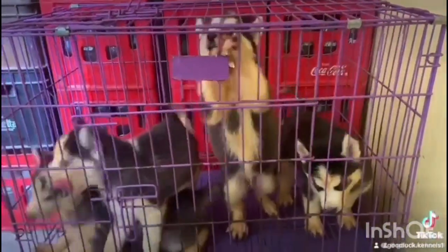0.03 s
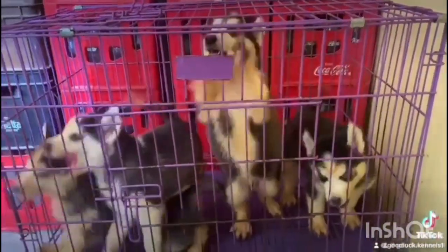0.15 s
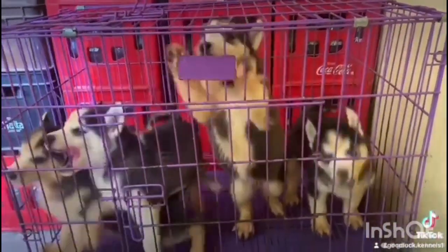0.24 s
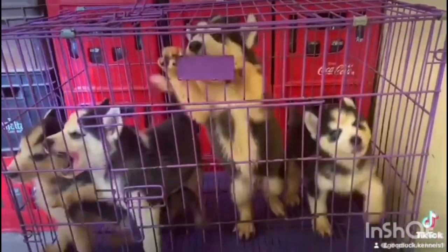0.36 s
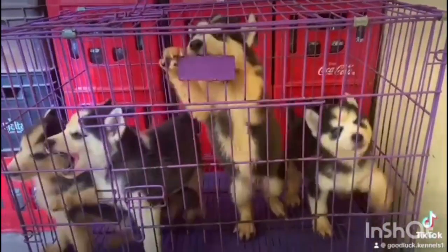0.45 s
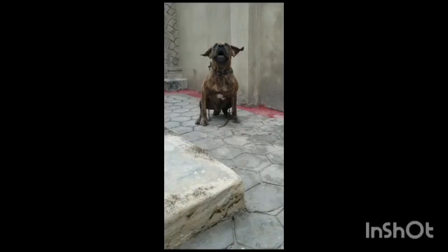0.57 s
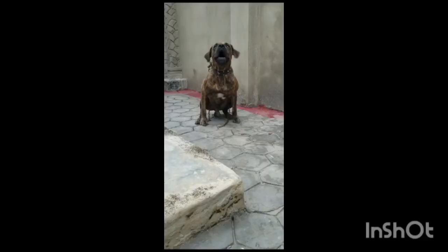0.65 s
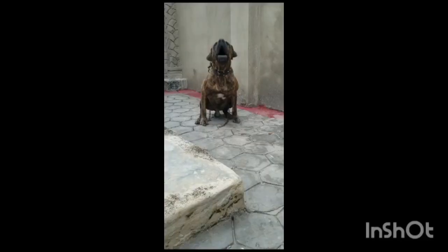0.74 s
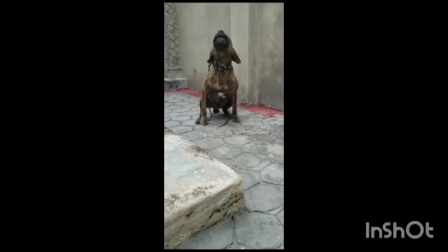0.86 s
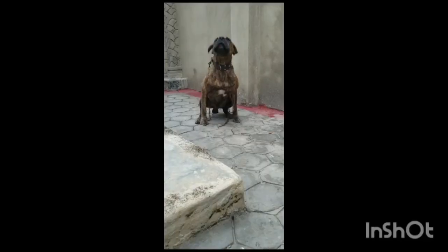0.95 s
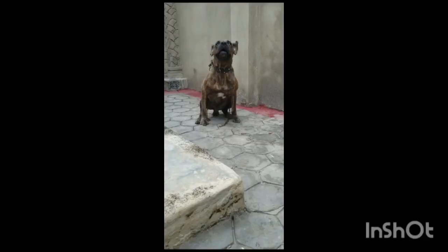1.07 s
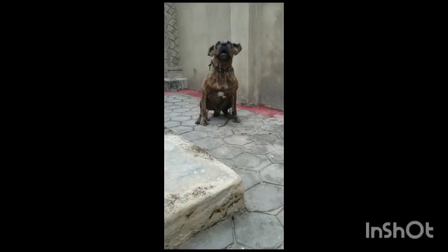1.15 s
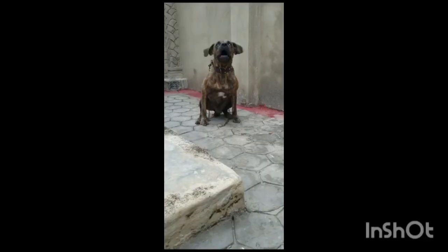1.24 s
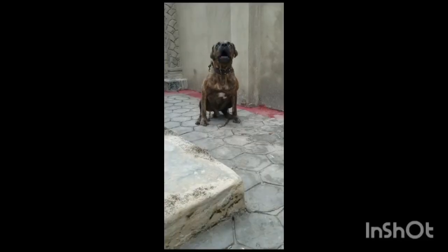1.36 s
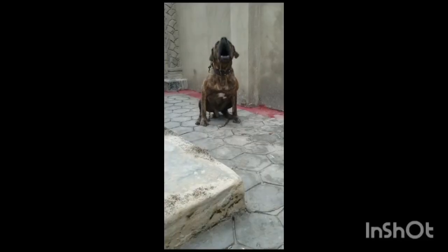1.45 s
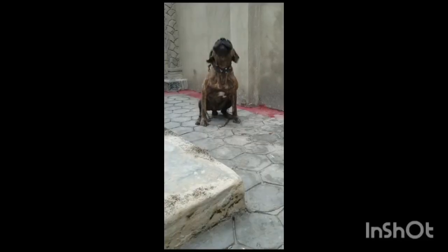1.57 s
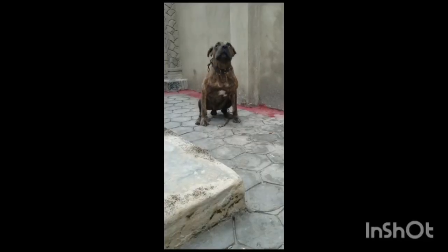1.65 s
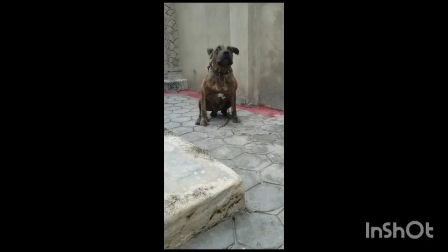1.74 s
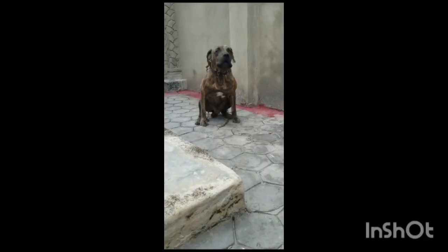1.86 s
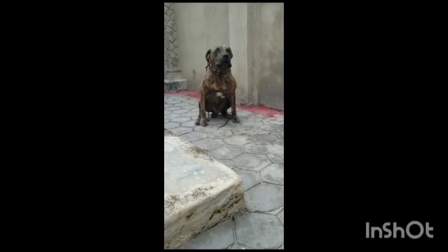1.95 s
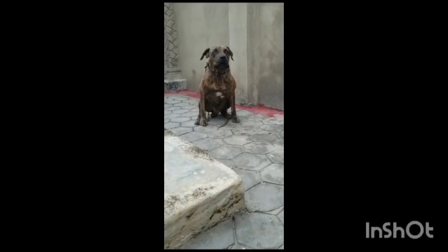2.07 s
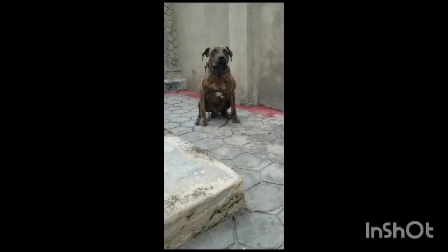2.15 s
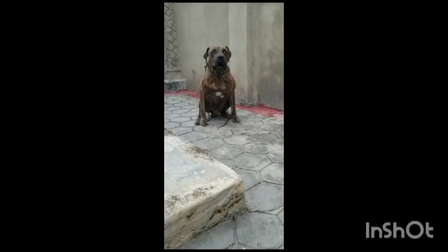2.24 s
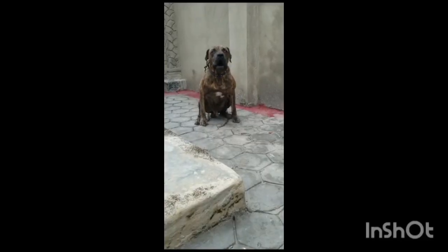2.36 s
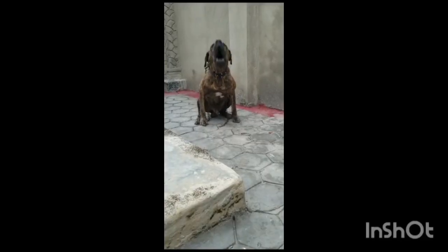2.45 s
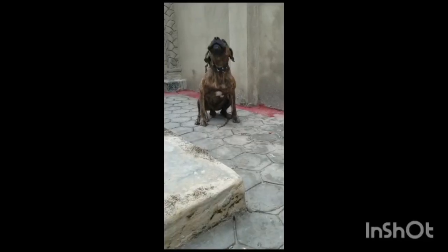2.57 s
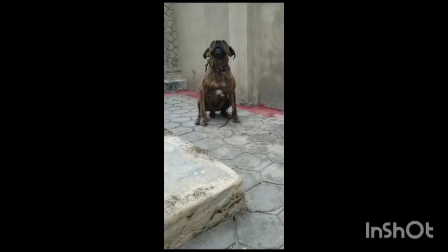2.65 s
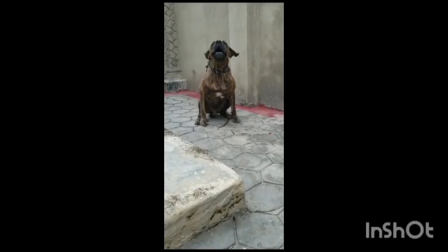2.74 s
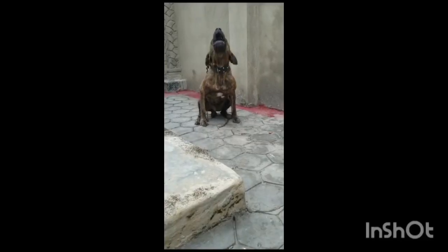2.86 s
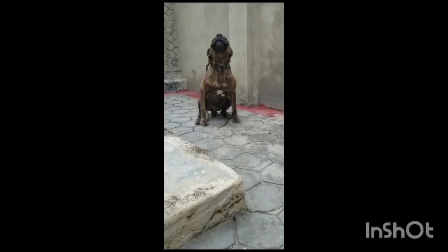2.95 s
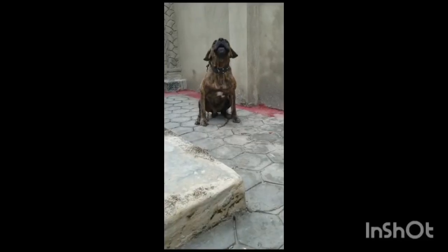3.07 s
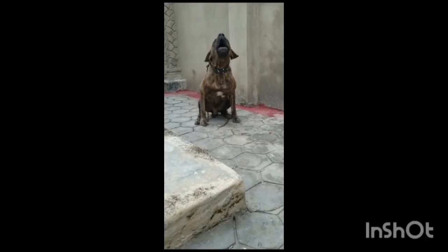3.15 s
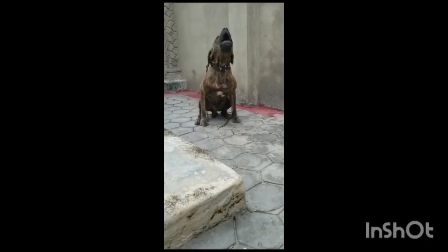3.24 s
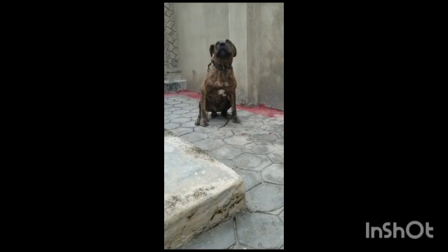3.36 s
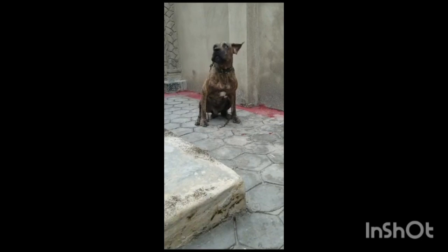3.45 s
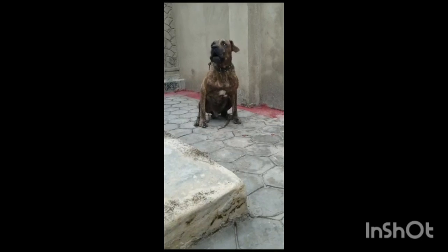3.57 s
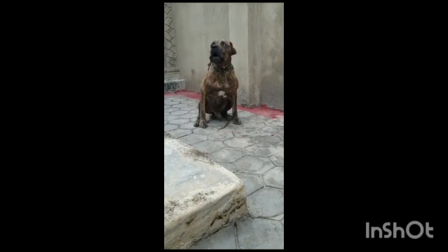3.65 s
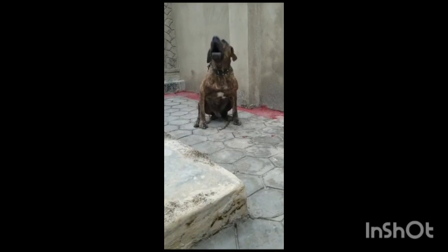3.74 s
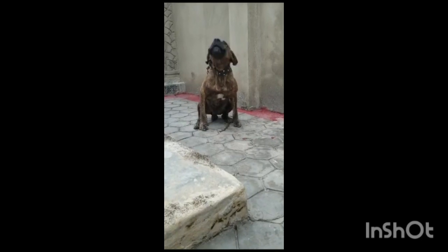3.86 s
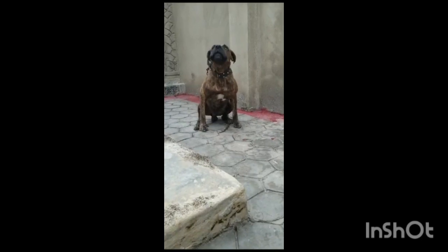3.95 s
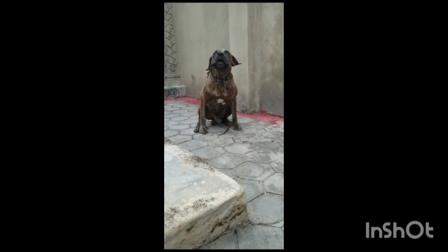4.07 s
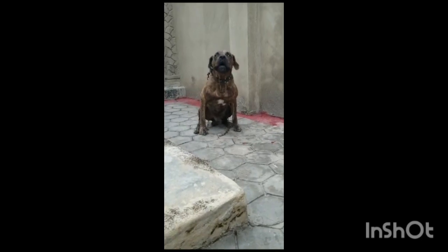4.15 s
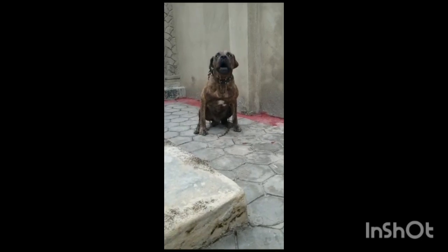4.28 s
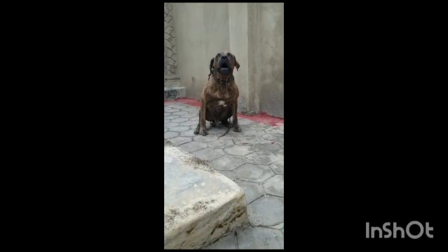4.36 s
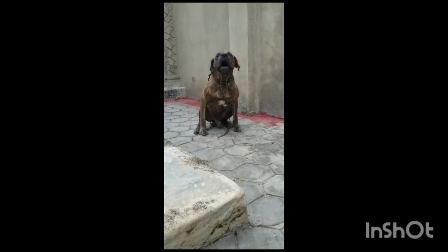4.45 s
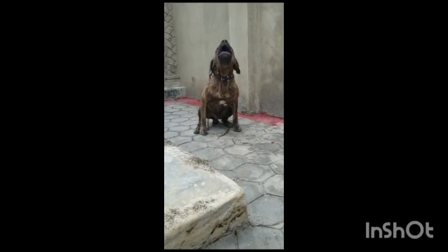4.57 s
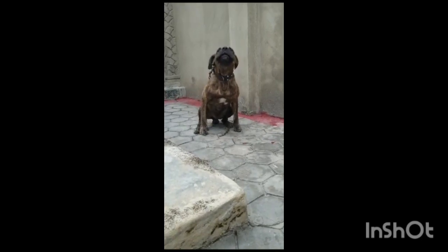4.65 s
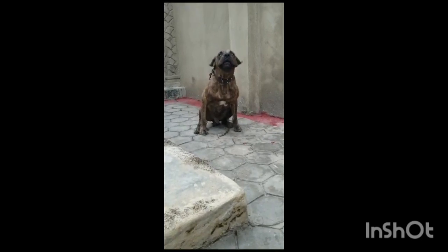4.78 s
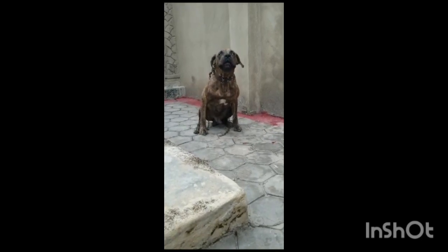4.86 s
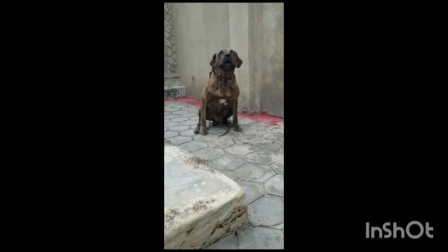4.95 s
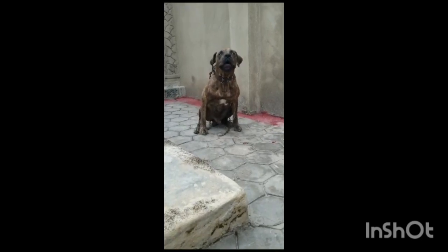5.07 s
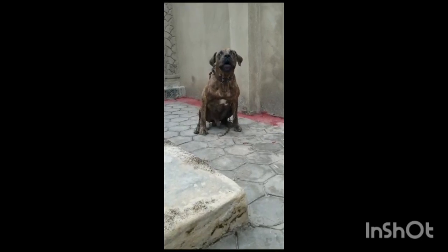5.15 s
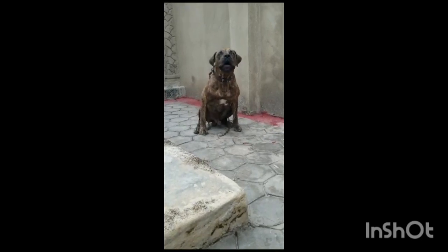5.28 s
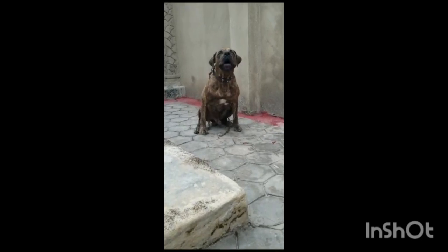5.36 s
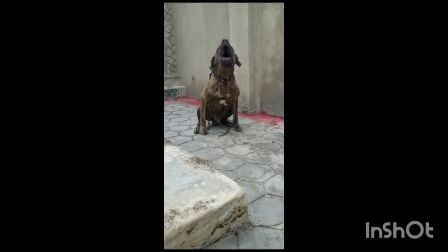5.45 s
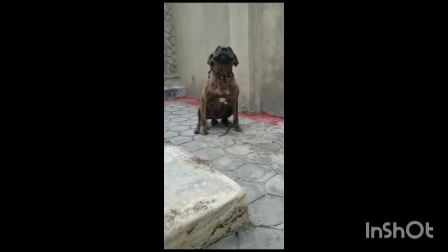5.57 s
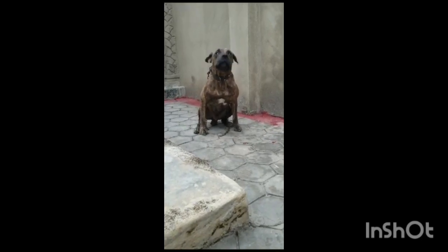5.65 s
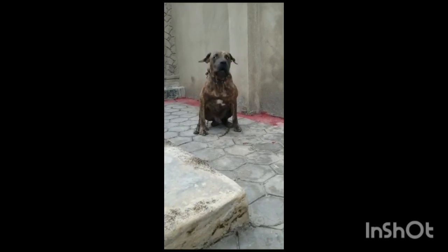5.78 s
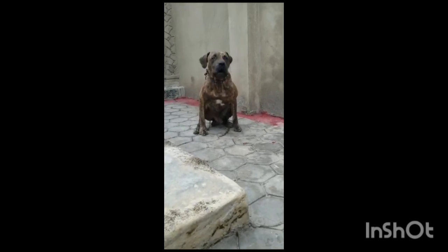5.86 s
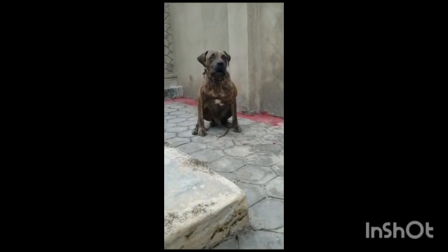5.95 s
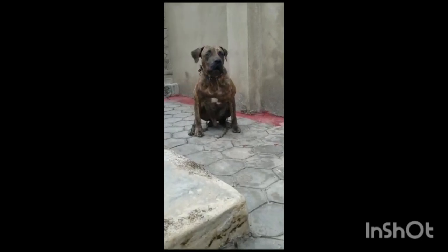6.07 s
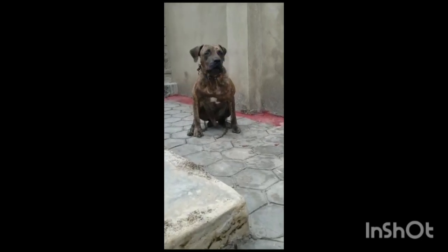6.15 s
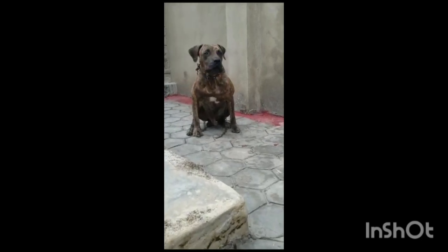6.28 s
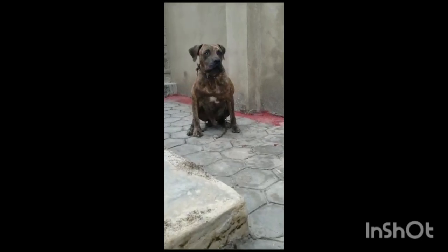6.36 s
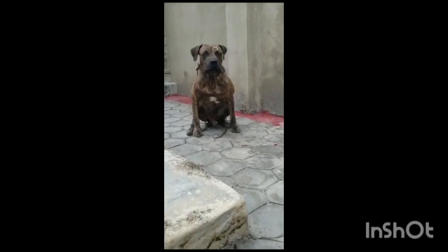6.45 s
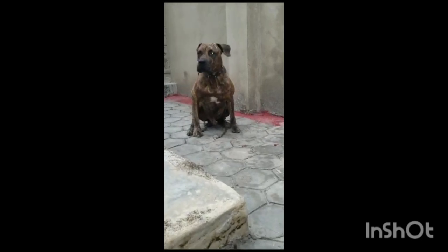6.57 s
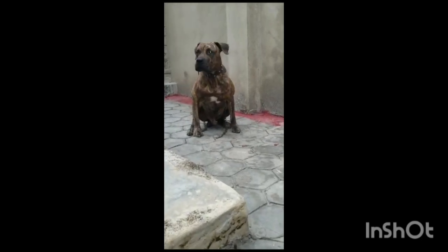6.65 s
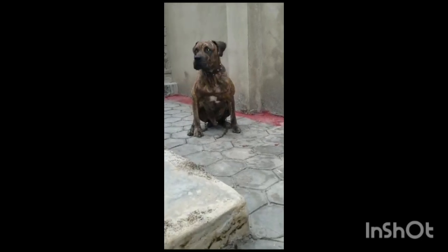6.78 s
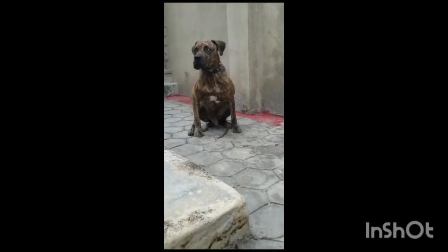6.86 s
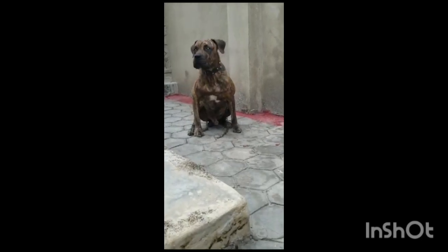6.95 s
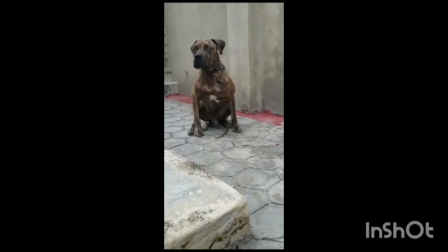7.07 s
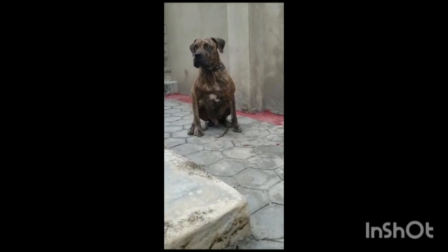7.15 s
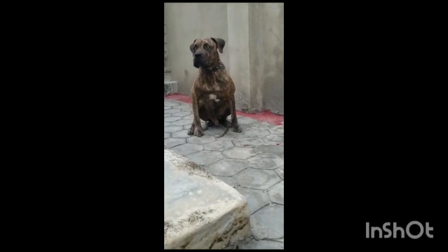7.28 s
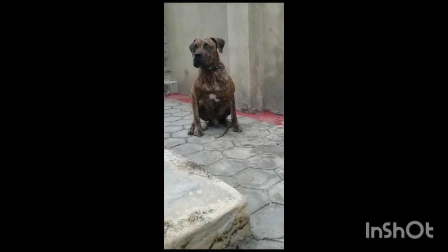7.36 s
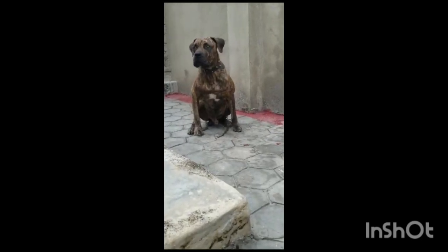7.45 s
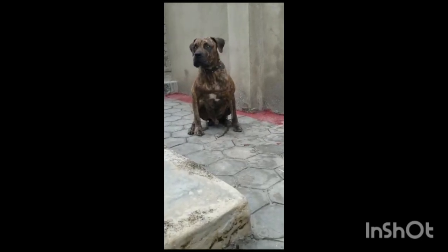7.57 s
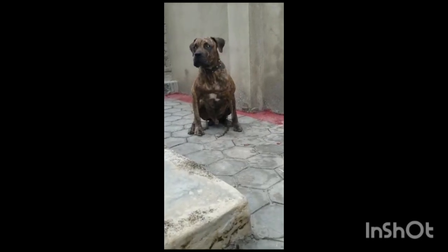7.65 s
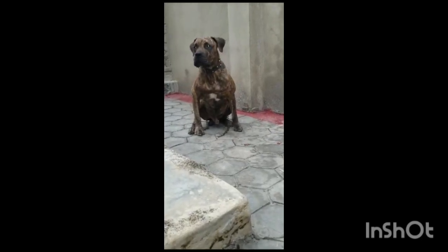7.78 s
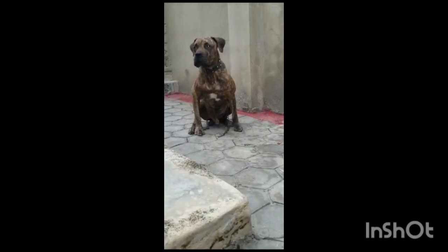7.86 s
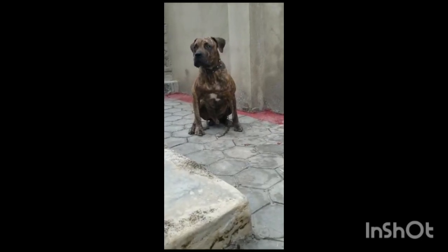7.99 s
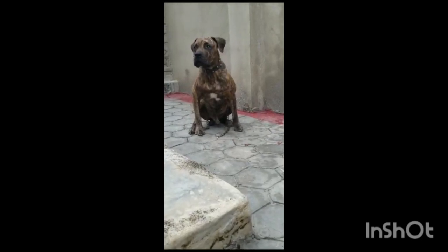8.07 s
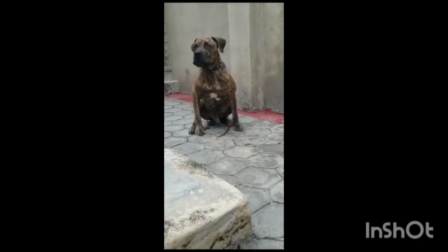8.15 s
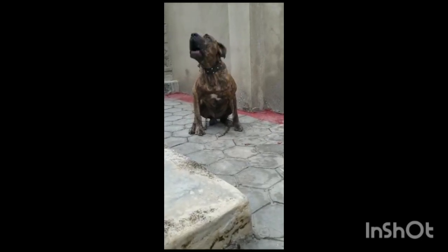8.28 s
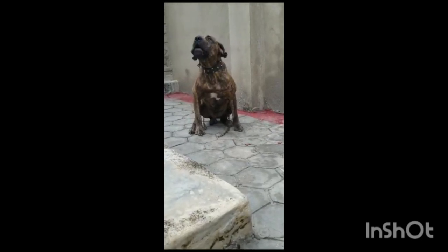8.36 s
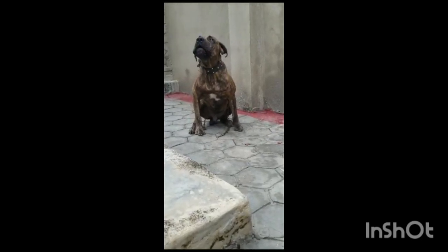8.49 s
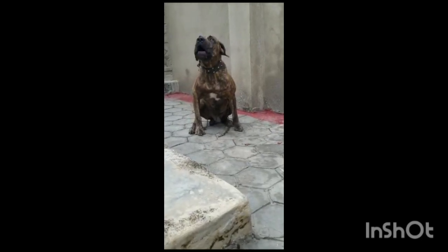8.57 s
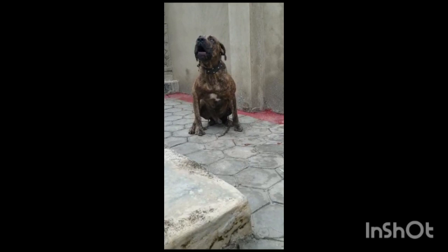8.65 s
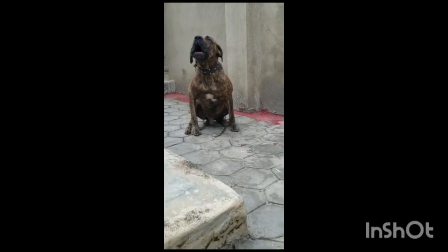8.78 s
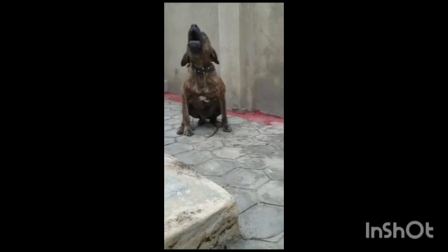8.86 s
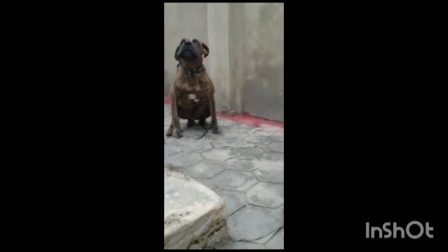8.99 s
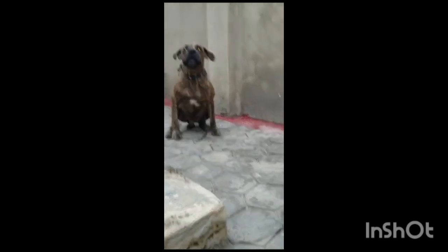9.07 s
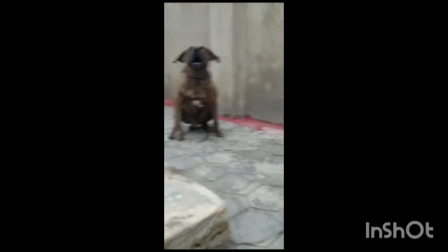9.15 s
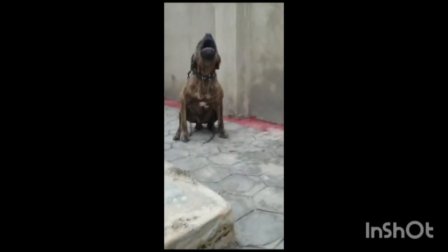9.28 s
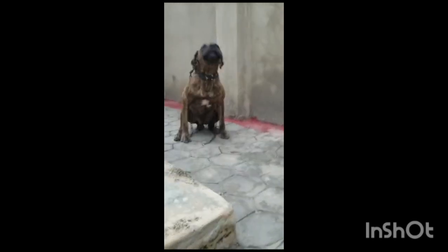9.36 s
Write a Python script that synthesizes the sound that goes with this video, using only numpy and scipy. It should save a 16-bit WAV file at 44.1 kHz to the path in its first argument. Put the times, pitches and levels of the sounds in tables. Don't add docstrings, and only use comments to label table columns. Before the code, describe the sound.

Silence until about 0.55 s, then a hard cut with tiny ticks into the echo of an earlier bark. A large dog a few metres from the phone barks at 0.75 and 1.4 s: short, deep-chested, rough and throaty, loud enough to clip, with wall slaps and a tail of most of a second. Distant yelps come near 1.15 s. Near barks follow at 2.4, 2.75, 3.15, 3.7, 4.45 and 5.4 s, the one at 3.15 slightly clearer. A higher young dog barks farther away at 5.25 s, then a run of five hoarse distant barks from 5.8 to 6.95 s. Faint whines around 7.5-8 s and a dull finger tap at 7.95 precede near barks at 8.15, 8.8 and 9.15 s, with faint metallic collar ticks. Sparse bird chirps, insect hiss and low town rumble continue underneath, swelling late.

```python
import sys
import numpy as np
from scipy import signal
from scipy.fft import rfft, irfft, next_fast_len
from scipy.io import wavfile
from scipy.ndimage import uniform_filter1d, map_coordinates

SR = 44100
rng = np.random.default_rng(int(sys.argv[2]) if len(sys.argv) > 2 else 0)


def to_wav(sig):
    pcm = np.clip(np.atleast_2d(sig), -1, 1) * 32767
    pcm = np.round(pcm).astype(np.int16)
    wavfile.write(sys.argv[1], SR, pcm.T)


def field_ratio(decibels):
    return 10 ** (np.asarray(decibels, dtype=float) / 20)


N = 415422


def unit(x):
    return x / np.sqrt(np.mean(x ** 2) + 1e-20)


def along(points, hz):
    f, v = np.transpose(points)
    return np.interp(np.log(hz + 1), np.log(f + 1), v)


def wobble(n, rate):
    knots = rng.standard_normal(int(SR / 2 * rate / SR + n * rate / SR) + 4)
    return map_coordinates(knots, [np.arange(n) * rate / SR])


def filtered(x, response):
    n = x.shape[-1]
    m = next_fast_len(n + 8192)
    return irfft(rfft(x, m) * response(np.fft.rfftfreq(m, 1 / SR)), m)[..., :n]


def modes(rows):
    def response(f):
        total = 0
        for k, (centre_hz, width_hz, db) in enumerate(rows):
            damping = 1j * f * width_hz
            total = total + (-1) ** k * field_ratio(db) * damping / (centre_hz ** 2 - f * f + damping)
        return total
    return response


def ring(x, hz, width_hz):
    turn = np.exp(2j * np.pi * np.cumsum(hz) / SR)
    return np.real(turn * signal.lfilter([1], [1, -np.exp(-np.pi * width_hz / SR)], x / turn))


def patchy(x, depth_db):
    z = signal.stft(x, nperseg=256)[2]
    field = uniform_filter1d(rng.standard_normal(z.shape), size=4, axis=0)
    field = uniform_filter1d(field, size=10, axis=1)
    return signal.istft(z * field_ratio(depth_db * unit(field)), nperseg=256)[1][:len(x)]


def fades(n, rise_s, fall_s):
    t = np.arange(n) / SR
    return np.clip(t / rise_s, 0, 1) * np.clip((t[-1] - t) / fall_s, 0, 1)


def shares(length_s):
    return np.arange(0, length_s, 1 / SR) / length_s


def hump(u, peak, before, after):
    peak = np.clip(peak, .05, .95)
    return -np.where(u < peak, before * (1 - u / peak) ** 2, after * ((u - peak) / (1 - peak)) ** 2)


def add(total, start, x):
    total[:, start:start + x.shape[1]] += x[:, :N - start]


def yard(x, direct_db, wet_db):
    # (frequency [Hz], t60 [s])
    t60_rows = [(150, 1), (400, 0.56), (1000, 0.58), (2000, 0.69), (3000, 0.67), (5600, 0.65), (7200, 0.33),
                (15000, 0.58)]
    hz = np.fft.rfftfreq(256, 1 / SR)[:, None]
    t = np.arange(240) * 128 / SR
    real, imag, lumps = rng.standard_normal((3, 3, len(hz), len(t)))
    lumps = uniform_filter1d(lumps[0], size=3, axis=0)
    lumps = unit(uniform_filter1d(lumps, size=8, axis=1))
    decay_db = 4.64 * lumps - 60 * t / along(t60_rows, hz)
    z = (real + 1j * imag) * field_ratio(decay_db) * np.clip(t / 0.0088, 0, 1)
    shared = z[0] / (1 + (hz / 1300) ** 2)
    tail = signal.istft(shared + 0.46 * z[1:], SR, nperseg=256)[1]
    tail = field_ratio(wet_db) * tail / np.linalg.norm(tail[0])
    tail[:, 0] = field_ratio(direct_db)
    for port, walls in zip(tail, rng.integers(60, 900, (2, 6))):
        port[walls] += field_ratio(direct_db - 8.0) * rng.choice([-1, 1], size=6)
    return signal.fftconvolve(x[None], tail, axes=1)


def ports(x, lag):
    # (frequency [Hz], left minus right [dB])
    colour_rows = [(50, -7.5), (250, -4.5), (1000, -2.5), (3000, -5.5), (5000, -9), (9000, 0),
                   (14000, -0.5)]
    side = np.array([[.5], [-.5]])
    return filtered(x, lambda f: field_ratio(side * along(colour_rows, f)) * np.exp(-2j * np.pi * f * side * lag / SR))


def air():
    # (time [s], rumble level [dB], insect level [dB])
    level_rows = [
        (0, -70.5, -86.5),
        (6.599, -73.5, -90),
        (6.9, -62.5, -70.5),
        (7.501, -68, -81.5),
        (7.8, -61, -76.5),
        (8.4, -55, -74.5),
        (9.42, -65, -83.5),
    ]
    # (frequency [Hz], density [dB per Hz])
    insect_rows = [(4800, -28), (5400, -1.5), (5750, -11), (6100, -5.5), (6500, -34)]
    # (frequency [Hz], density [dB per Hz])
    rumble_rows = [(20, -11), (60, -3.5), (120, -2.5), (180, -12), (260, -10), (400, -8), (800, -18.5),
                   (1200, -52.5)]
    # (frequency [Hz], density [dB per Hz])
    hiss_rows = [(410, -53.5), (700, -24.5), (1320, -16), (2590, -17), (3180, -12), (4400, -14.5),
                 (5850, -5.5), (6660, -21.5), (15400, -19)]

    def noise(shape):
        return unit(filtered(rng.standard_normal((2, N)), lambda f: field_ratio(along(shape, f))))

    time_s, *levels = np.transpose(level_rows)
    rumble_db, insect_db = (np.interp(np.arange(N) / SR, time_s, level) for level in levels)
    rumble = field_ratio(rumble_db + 2.5 * wobble(N, 5)) * noise(rumble_rows)
    insect = field_ratio(insect_db) * noise([(4000, -85), *insect_rows, (7500, -79.0)])
    hiss = field_ratio(-70.0 + 0.41 * (insect_db + 87.5)) * noise([(200, -79.5), *hiss_rows])
    return rumble + insect + hiss


def small_sounds():
    # (time [s], length [s], from [Hz], to [Hz], level [dB])
    chirp_rows = [
        (1.212, .06, 3320, 3400, -69),
        (1.878, 0.2, 3400, 3340, -77.5),
        (2.34, 0.11, 3510, 3180, -69),
        (3.593, .15, 3800, 2880, -65),
        (7.005, .25, 3380, 3280, -83),
        (7.051, .15, 3020, 2830, -79),
        (7.281, .22, 3110, 3100, -79),
    ]
    # (time [s], level [dB])
    tap_rows = [
        (7.9362, -37),
    ]
    # (time [s], level [dB])
    cut_rows = [
        (.5540, -27),
        (.5757, -29),
    ]
    # (time [s], frequency [Hz], level [dB])
    collar_rows = [
        (8.494, 5900, -49),
        (8.76, 3600, -57),
        (8.773, 5500, -70),
        (9.112, 6300, -57),
    ]
    settle_s = .018
    out = np.zeros((2, N))
    both = np.ones((2, 1))
    for s, length_s, from_hz, to_hz, db in chirp_rows:
        hz = to_hz + (from_hz - to_hz) * np.exp(-shares(length_s) * length_s / settle_s)
        n = len(hz)
        phase = 2 * np.pi * np.cumsum(hz * (1 + 0.0089 * wobble(n, 84.0))) / SR
        note = np.sin(phase) + .12 * np.sin(2 * phase)
        add(out, round(s * SR), field_ratio(db + 6 * wobble(n, 40)) * fades(n, .02, .02) * note * both)
    t = np.arange(600) / SR
    for s, db in tap_rows:
        thud = -np.cos(2 * np.pi * 130 * t + .6) * field_ratio(-60 * t / .03)
        click = 2.2 * field_ratio(-60 * t / .002) * (1 - .6 * np.cos(2 * np.pi * 5200 * t))
        add(out, round(s * SR), field_ratio(db + np.array([[-4], [1]])) * (thud - click))
    for s, db in cut_rows:
        add(out, round(s * SR), field_ratio(db - 60 * t / .0006) * both)
    for s, hz, db in collar_rows:
        add(out, round(s * SR), field_ratio(db - 60 * t / 0.025) * np.sin(2 * np.pi * hz * t) * both)
    return out


def arch(length_s, top_hz, low_db, high_db):
    u = shares(length_s)
    pitch_hz = top_hz * (1 + hump(u, peak=.45, before=.24, after=.24))
    return pitch_hz, low_db + hump(u, 0.32, 8.5, 14), high_db + hump(u, 0.38, 17, 17)


def glide(length_s, from_hz, to_hz, db, even_hz, bright_db_per_hz):
    u = shares(length_s)
    peak = np.clip(.5 + 3.5 * (to_hz / from_hz - 1), .1, .85)
    hz = from_hz + (to_hz - from_hz) * u ** (1.5 * peak)
    low_db = db + hump(u, peak, 10, 14.5)
    return hz, low_db, low_db + bright_db_per_hz * (hz - even_hz)


def call(pitch_hz, low_db, high_db, rough, tracts):
    n = len(pitch_hz)
    k = np.arange(1, 10)[:, None]
    phase = 2 * np.pi * np.cumsum(pitch_hz * (1 + .05 * rough * wobble(n, 120))) / SR
    partials = np.sin(k * phase) * field_ratio(7 * rough * wobble(n, 90))
    voice = 0
    for tract, db in zip(tracts, (low_db, high_db)):
        tone = unit(np.sum(field_ratio(along(tract, k * pitch_hz)) * partials, axis=0))
        hoarse = filtered(rng.standard_normal(n), lambda f: field_ratio(along([(100, -64.0), *tract], f)))
        voice = voice + field_ratio(db) * (tone + rough ** 2 * unit(hoarse))
    return fades(n, .03, .03) * voice


def far_dogs():
    # (time [s], length [s], top pitch [Hz], low partials [dB], high partials [dB])
    arch_rows = [
        (5.235, 0.11, 516.4, -30.5, -34),
        (5.817, .13, 525, -40, -52.5),
        (6.005, .2, 494.4, -38, -48.5),
        (6.236, .22, 492.3, -38.5, -46),
        (6.483, .23, 490, -37.5, -43.5),
        (6.73, .23, 470, -33, -41.5),
    ]
    # (time [s], length [s], from [Hz], to [Hz], level [dB])
    yelp_rows = [
        (1.14, 0.072, 451, 549, -30),
        (1.195, 0.09, 705, 656, -44.5),
        (4.84, 0.05, 703, 752, -48.5),
        (6.96, 0.184, 402.5, 337.4, -54),
    ]
    # (time [s], length [s], from [Hz], to [Hz], level [dB])
    whine_rows = [
        (2.27, 0.18, 294.6, 312, -65),
        (7.46, 0.17, 306, 258.3, -57),
        (7.77, 0.179, 276.3, 338, -53.5),
        (7.95, 0.11, 350.2, 359.5, -42),
    ]
    # (time [s], length [s], from [Hz], to [Hz], level [dB])
    thin_rows = [
        (.66, 0.057, 560, 570, -69.5),
        (4.2, .24, 554, 527, -80),
    ]
    # (frequency [Hz], gain [dB])
    far_low = [(180, -15), (260, -22.5), (350, 3), (480, -4), (700, -2), (950, -7), (1150, -2),
               (1300, -48.5)]
    far_high = [(1000, -56.5), (1150, 1), (1400, -1.5), (1800, -9), (2150, -19.5), (2600, -36),
                (3000, -100)]
    whine_low = [(250, -26), (360, -7.5), (550, -5), (750, -2), (950, -7.5), (1150, -26.5), (1300, -50.5)]
    whine_high = [(1000, -60), (1250, -6), (1450, 0), (1750, -32), (2150, -22), (2600, -45), (3200, -60)]
    pup_low = [(380, -46), (480, -13.5), (700, 7.5), (950, 0), (1150, -5), (1300, -51.5)]
    thin_high = [(1300, -60), (1550, -6), (1700, 0), (1900, -14), (2200, -60)]

    barks = [(s, arch(*row)) for s, *row in arch_rows]
    thin = [(s, glide(*row, 407, 0.098)) for s, *row in thin_rows]
    yelps = [(s, glide(*row, 603, 0.13)) for s, *row in yelp_rows]
    whines = [(s, glide(*row, 347, 0.18)) for s, *row in whine_rows]
    hoarse, rough, clear = 1.1, .54, .38
    # (calls, roughness, wet dB, tracts)
    groups = ((barks[:1], rough, -6, (pup_low, far_high)),
              (thin, hoarse, -3, (far_low, thin_high)),
              (barks[1:], rough, -7.5, (far_low, far_high)),
              (yelps, (rough + clear) / 2, -7, (far_low, far_high)),
              (whines, clear, -8, (whine_low, whine_high)))
    out = np.zeros((2, N))
    for calls, roughness, wet_db, tracts in groups:
        for s, controls in calls:
            add(out, round(s * SR), yard(call(*controls, roughness, tracts), direct_db=-2.0, wet_db=wet_db))
    return ports(out, lag=3)


def jaw_moves(s, length_s, effort_db, rate_hz, peak, throat_hz, from_hz, to_hz, mouth_db, upper_db):
    # (time [s], half-width [s], roughness lost [0-1])
    clear_rows = [
        (3.21, .04, .5),
        (8.29, .05, .35),
    ]
    attack_s, gape_share = 0.023, .65
    shake_share, shakes_per_s = .032, 35
    u = shares(length_s)
    n = len(u)
    shut = np.clip(1 - u * length_s / attack_s, 0, 1)
    mouth_shake = 1 + shake_share * wobble(n, shakes_per_s)
    upper_shake = 1 + shake_share * wobble(n, shakes_per_s)
    mouth_hz = from_hz + (to_hz - from_hz) * np.clip(u / gape_share, 0, 1)
    upper_hz = 1357 - 130 * u + 0.73 * (to_hz - from_hz) * (1 - .5 * u)
    rough = .8
    for at_s, half_s, lost in clear_rows:
        rough = rough - lost * np.exp(-((s + u * length_s - at_s) / half_s) ** 2)
    return dict(
        effort_db=effort_db - 6 * shut + hump(u, peak, 7, 13.5),
        rate_hz=rate_hz * (1 + .05 * (u - .5)),
        throat_hz=throat_hz * (1 - 0.097 * (u - .5)),
        mouth_hz=mouth_shake * mouth_hz,
        mouth_db=mouth_db - 10.5 * shut + 9.5 * (u - .5),
        upper_hz=upper_shake * upper_hz,
        upper_db=upper_db - 12 * shut - 3.5 * u ** 2,
        breath_db=-17.5 + 0.88 * upper_db - 8 * shut - 5 * u ** 2,
        rough=rough)


def bark(effort_db, rate_hz, throat_hz, mouth_hz, mouth_db, upper_hz, upper_db, breath_db, rough):
    # (centre [Hz], width [Hz], level [dB])
    nose_rows = [(1750, 160, -6), (2150, 140, -10)]
    # (centre [Hz], width [Hz], level [dB])
    chest_rows = [(375, 60, -12)]
    # (frequency [Hz], density [dB per Hz])
    breath_rows = [(1470, -26.5), (2500, -8), (3120, -11), (3690, -8), (4170, -10), (5690, -10.5),
                   (6630, -18), (7660, -19.5), (11700, -20), (15400, -28.5)]
    n = len(rate_hz)
    phase = np.cumsum(rate_hz * (1 + .1 * rough * wobble(n, 180))) / SR
    slaps = np.diff(np.floor(phase), prepend=0) * field_ratio(3.7 * rough * rng.standard_normal(n))
    puff = (.5 + .5 * np.cos(2 * np.pi * phase)) ** 2
    puff_share = np.clip(0.78 * rough ** 2, 0, 1)
    folds = np.sqrt(1 - puff_share) * unit(slaps)
    folds = folds + np.sqrt(puff_share) * unit(puff * rng.standard_normal(n))
    folds = filtered(folds, lambda f: (f ** 2 / (f ** 2 + 280 ** 2)) ** 2 / (1 + (f / 2400) ** 4))

    chest = unit(filtered(folds, modes(chest_rows)))
    throat = unit(ring(folds, throat_hz, 56.0)) + field_ratio(-14.5) * chest
    gape = unit(ring(folds, 1.327 * mouth_hz, 310.0))
    mouth = unit(ring(folds, mouth_hz, 80.)) + field_ratio(-5.5) * gape
    nose = unit(filtered(folds, modes(nose_rows)))
    upper = unit(unit(ring(folds, upper_hz, 130.0)) - field_ratio(-9.0) * nose)

    breath = patchy((1.3 + puff) * rng.standard_normal(n), depth_db=7.5)
    breath = unit(filtered(breath, lambda f: field_ratio(along(breath_rows, f))))
    blast = unit(ring(rng.standard_normal(n), np.full(n, 10500.), 1400.))
    blast = blast * np.exp(-((np.arange(n) / SR - .035) / .025) ** 2)
    breath = breath + 0.36 * blast
    voice = throat - field_ratio(mouth_db) * mouth + field_ratio(upper_db) * upper + field_ratio(breath_db) * breath
    return field_ratio(effort_db) * fades(n, .005, 0.04) * voice


def dog():
    # (time [s], length [s], effort [dB], fold rate [Hz], effort peak [share of length])
    bark_rows = [(0.288, 0.11, -11.5, 197.3, .4), (0.754, .18, -10.5, 231.2, .3),
                 (1.437, 0.15, -15, 178.2, 0.32), (2.411, 0.17, -12.5, 232.2, 0.27),
                 (2.767, 0.17, -12.5, 171.5, 0.61), (3.132, 0.18, -12, 161.2, 0.32),
                 (3.732, .16, -12, 212.3, .55), (4.464, 0.16, -12, 229, 0.41),
                 (5.384, .18, -13.5, 156.9, 0.37), (8.147, 0.21, -13.5, 165.7, .5),
                 (8.797, 0.16, -14, 211.1, 0.42), (9.148, 0.16, -15, 223.8, 0.43)]
    # (throat [Hz], mouth at first [Hz], mouth at last [Hz], mouth level [dB], upper level [dB])
    jaw_rows = [(426, 799, 775, 2, 2), (504, 810, 880, 0, -2.5), (498, 750, 920, 3.5, -2),
                (464, 720, 880, 0, -6), (450, 790, 780, 1.5, -2.5), (458.7, 720, 790, -0.5, -5.5),
                (470, 710, 830, 0, -6.5), (456, 715, 810, 1, -5), (480, 860, 940, 3.5, 1),
                (510, 680, 1140, 4.5, 3.5), (461.4, 805, 770, 0.5, -2.5), (454, 840, 805, 5, -1.5)]
    out = np.zeros((2, N))
    for (s, *effort), jaws in zip(bark_rows, jaw_rows):
        voice = bark(**jaw_moves(s, *effort, *jaws))
        add(out, round(s * SR), yard(voice, direct_db=-0.5, wet_db=-9))
    return ports(out, lag=-8)


def scene():
    return air() + small_sounds() + far_dogs() + dog()


def roll_off(x):
    return signal.sosfilt(signal.butter(12, 15600, fs=SR, output="sos"), x)


def record(dry):
    start_s = .5525
    clipped = dry / (1 + abs(dry / 1.0) ** 12) ** (1 / 12)
    mix = filtered(clipped, lambda f: np.where(f < 15700, 1, .8))
    return roll_off(mix * (np.arange(N) >= start_s * SR))


dry = scene()
out = record(dry)
to_wav(out)
```